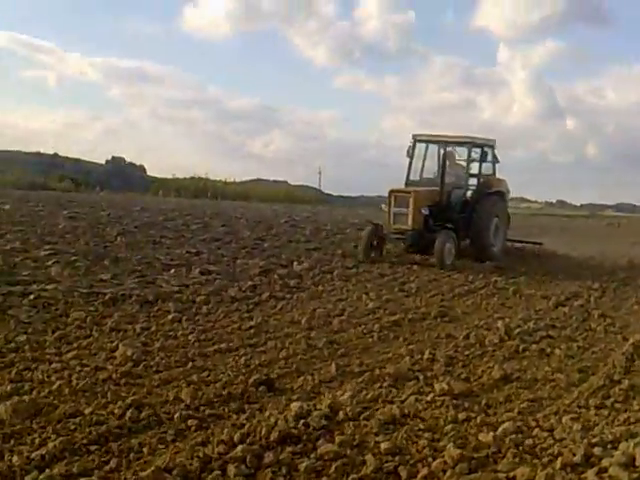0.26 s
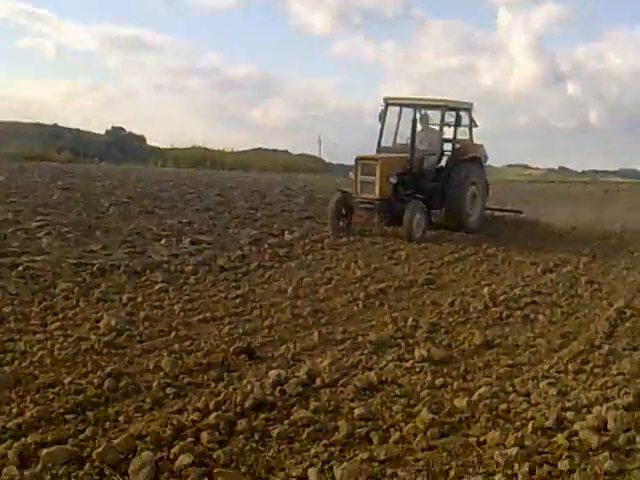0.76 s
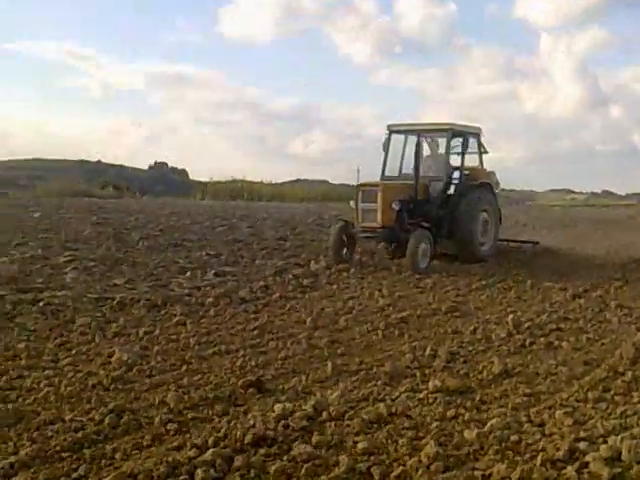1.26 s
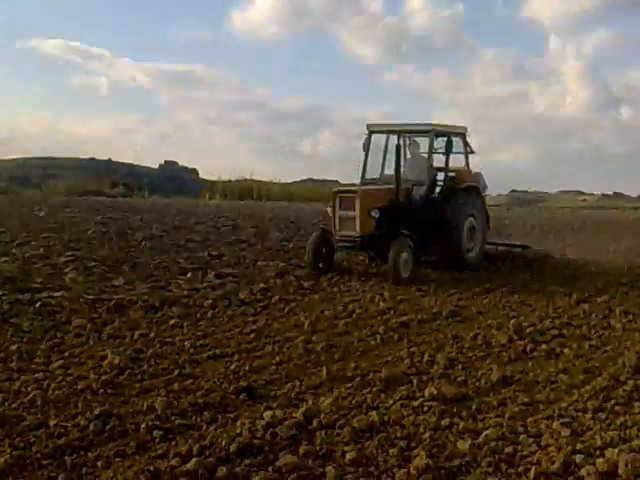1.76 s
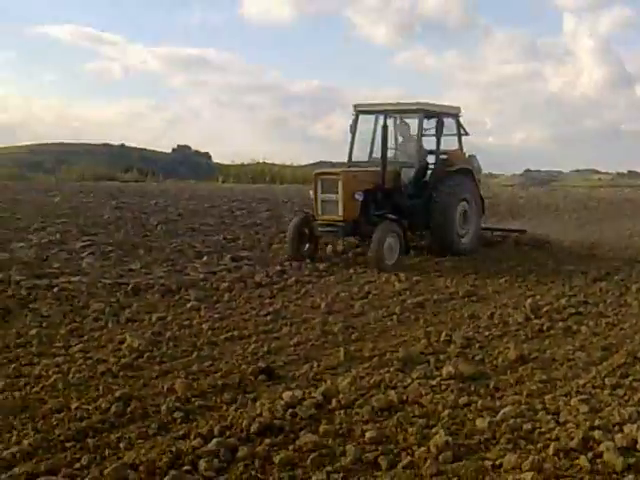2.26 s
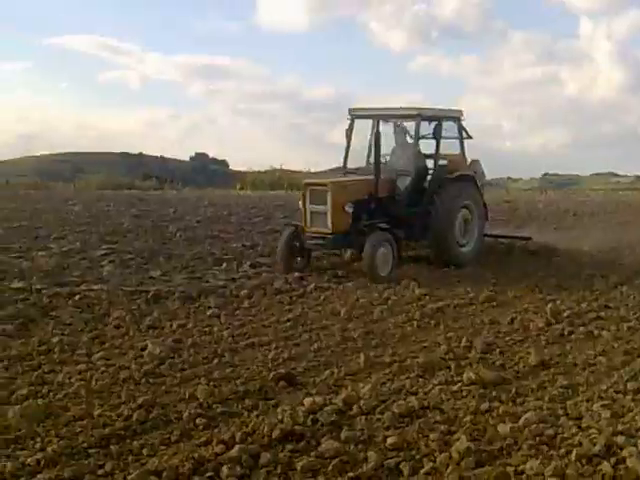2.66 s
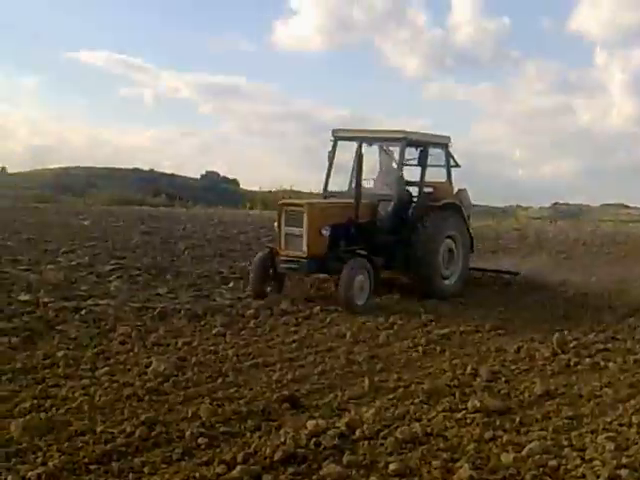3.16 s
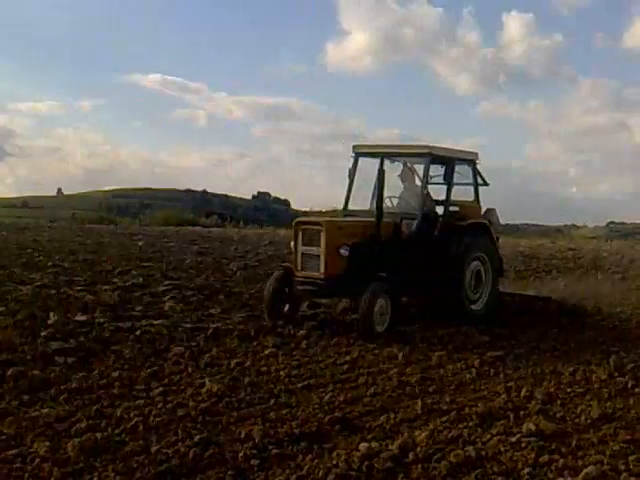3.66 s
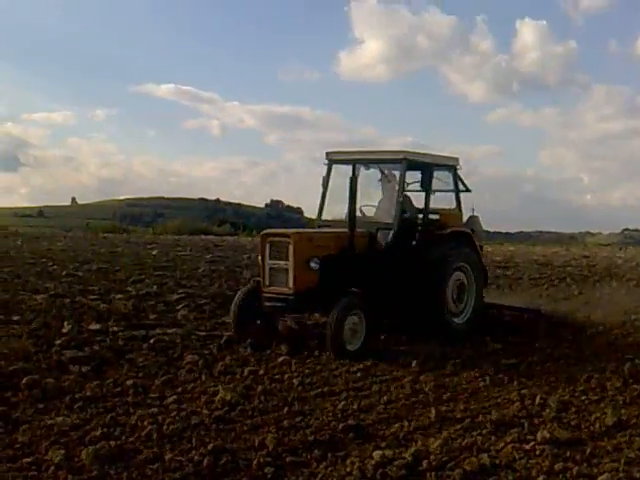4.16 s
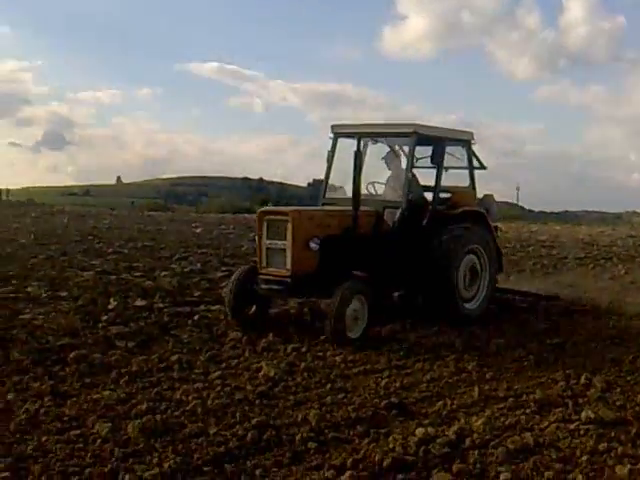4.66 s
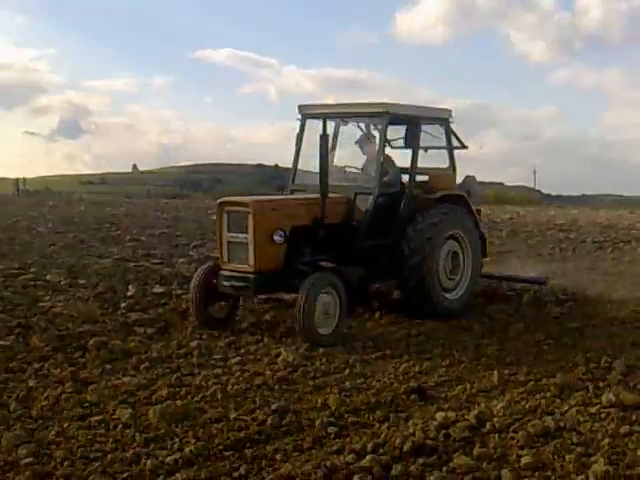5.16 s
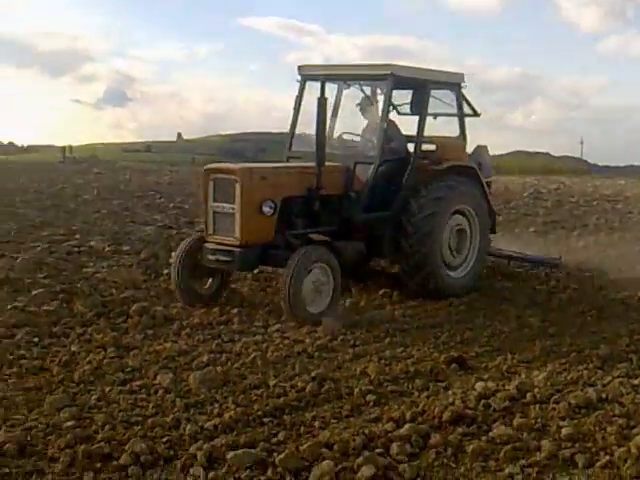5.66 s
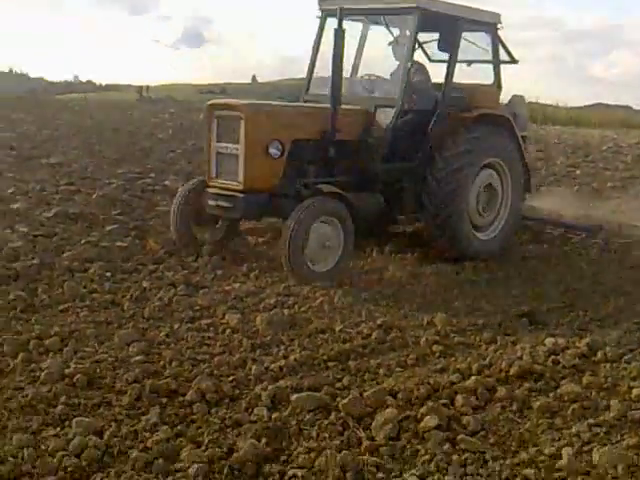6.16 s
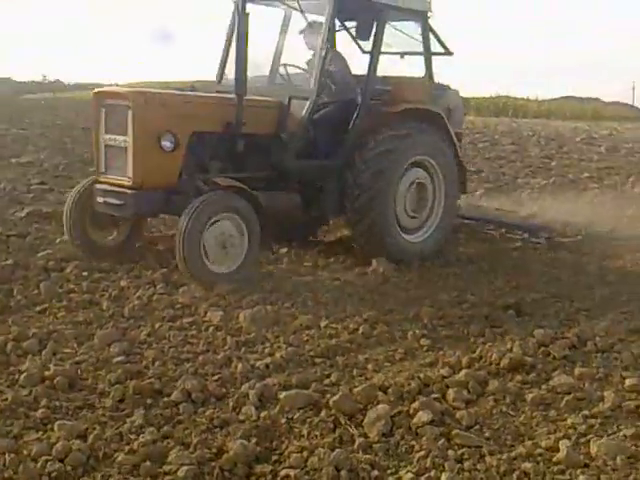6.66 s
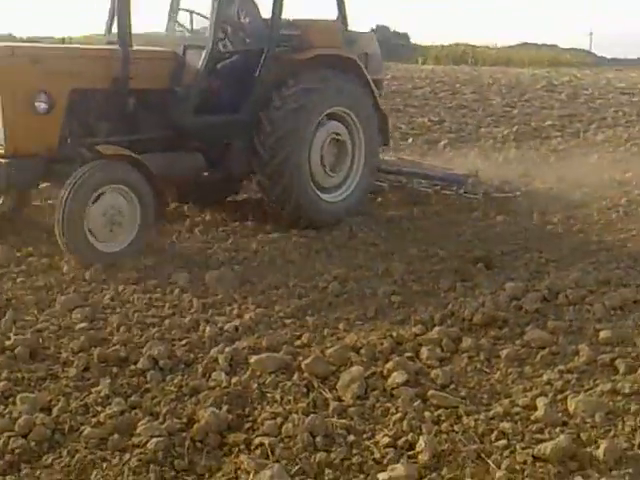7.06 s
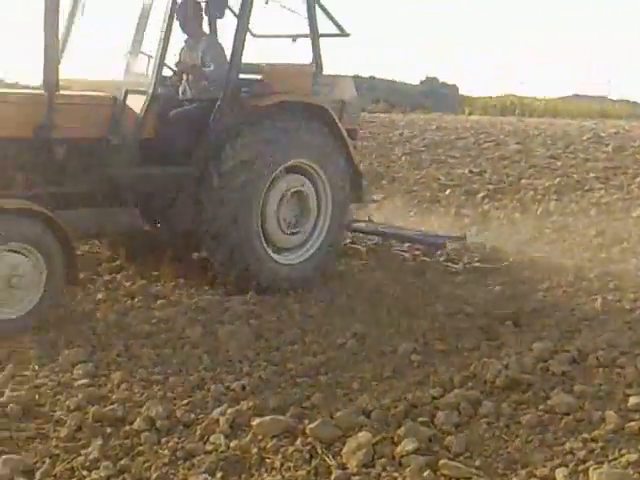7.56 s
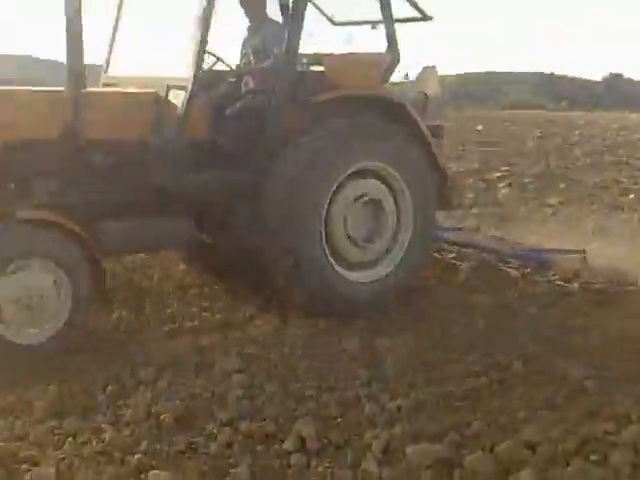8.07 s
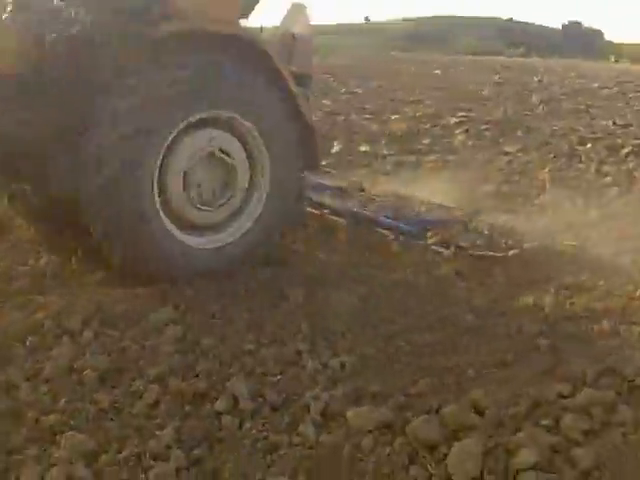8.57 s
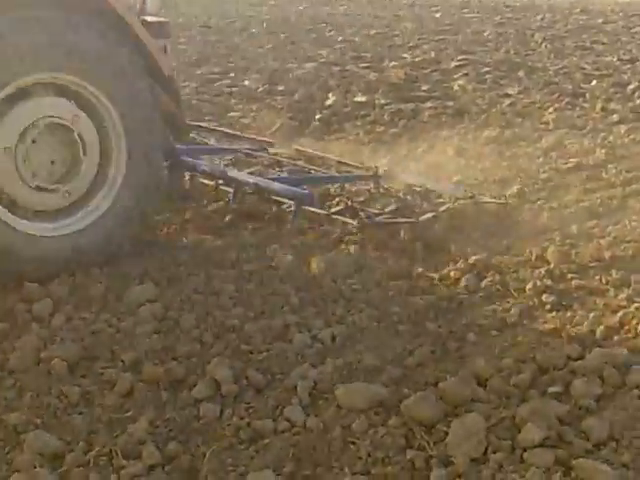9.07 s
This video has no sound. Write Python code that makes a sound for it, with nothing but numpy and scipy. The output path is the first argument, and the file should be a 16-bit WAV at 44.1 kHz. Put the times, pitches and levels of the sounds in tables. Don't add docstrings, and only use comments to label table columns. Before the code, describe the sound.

Low, rough four-cylinder diesel drone approaches across an open field with hard knocks, wind thumps, and clods rattling and hissing through a towed harrow.

```python
import sys
import numpy as np
from scipy import signal
from scipy.fft import rfft, irfft
from scipy.io import wavfile

SR = 44100
rng = np.random.default_rng(int(sys.argv[2]) if len(sys.argv) > 2 else 0)


def undo_db(level):
    steps = np.asarray(level, float) / 20
    return 10 ** steps


def unload_wav(signal):
    wavfile.write(
        sys.argv[1],
        SR,
        np.round(np.clip(np.atleast_2d(signal).T, -1, 1) * 32767).astype(np.int16),
    )


N = 410130

# time in seconds, firings per second.
FIRING_RATE = [(0.0, 50.06), (0.65, 49.95), (1.11, 50.1), (1.73, 49.4), (2.16, 50.27), (2.64, 49.82),
               (3.15, 46.97), (3.78, 49.25), (4.06, 48.76), (5.95, 49.29), (6.14, 49.56), (7.29, 47.29),
               (7.51, 47.81), (7.8, 49.28), (7.95, 48.98), (8.24, 46.11), (8.41, 45.3), (9.3, 44.56)]
# time in seconds, second order level in dB,
# first order level in dB relative to the second. (Order 1 = one wave per firing.)
EXHAUST_LEVELS = [(0, -34, 4), (.3, -26, -6), (1.7, -29, -17), (2.2, -26, 1), (2.7, -32.5, 6),
                  (3.15, -28, -6), (3.6, -26.5, -3), (4.1, -26, 1), (4.5, -23.5, -8), (5, -27, -3),
                  (6.3, -25, -10.5), (7.3, -26.5, -6), (7.75, -30.5, 7), (8.15, -31.5, 4.5),
                  (8.6, -22.5, -9), (9.3, -20, -5)]
# multiple of the firing rate, level in dB relative to the second order,
# dB gained when near.
UPPER_ORDERS = [(4, -15, 4), (5, -27, 21), (5.6, -44, 31), (6, -36, 22), (7, -27, 11), (8, -30, 15),
                (8.67, -34, 21), (10, -21, -12), (11, -22, -12), (15, -22, -2), (34.67, -23, -6)]
# time in seconds, nearness from 0 to 1, engine body level in dB.
APPROACH_PATH = [(0, 0, -32), (1.5, 0.02, -30.5), (3, 0.12, -31.5), (4.2, 0.16, -27.5), (6, 0.24, -27),
                 (7.2, 0.81, -24), (8.2, 0.88, -26), (8.8, 0.94, -21.5), (9.3, 0.93, -19)]
# frequency in Hz, level in dB per Hz.
FRONT_SPECTRUM = [(60, -3), (200, 6.5), (500, -1.5), (900, 0.5), (1300, 1), (1700, -4), (2400, -1.5),
                  (3100, -7.5), (3450, -16.5), (3900, -22.5), (4300, -32), (7000, -32), (11000, -40),
                  (15500, -45)]
# frequency in Hz, level in dB per Hz.
SIDE_SPECTRUM = [(60, -4), (220, -2.5), (480, -6.5), (660, 4), (900, -4), (1400, 2), (2000, 0),
                 (3100, -0.5), (3450, -9.5), (3900, -14), (4300, -28), (6500, -32), (10000, -35.5),
                 (15500, -45.5)]
# frequency in Hz, level in dB, 60 dB decay time in seconds.
BLOCK_MODES = [(583, 4.5, 0.05), (999, 2.5, 0.029), (1333, 3.5, 0.035), (1736, 0.5, 0.078),
               (2365, -1, 0.12), (2690, 2.5, 0.032)]
# start in seconds, lasting in seconds,
# peak level in dB, crack level in dB relative to the peak.
HARD_KNOCKS = [(2.6196, 0, -22, -30), (3.7169, 0, -14, -33), (4.9794, 0, -19, -33), (5.0266, .03, -15, -34),
               (5.6386, 0, -12, -38), (5.6775, 0, -4, -38), (5.697, 0, -15, -34), (6.737, 0, -3, -34),
               (6.7795, 0, -5, -36), (7.6572, .195, -7, -30), (8.903, 0, -11, -33), (8.9458, 0, -10, -33),
               (9.174, 0, -8, -26)]
# frequency in Hz, level in dB per Hz.
CRACK_SPECTRUM = [(2000, -16), (4500, 0), (9000, -2), (15500, -18)]
# frequency in Hz, level in dB per Hz.
TICK_SPECTRUM = [(3500, -20), (6300, -10), (7500, 2.5), (10000, 3.5), (11300, -5), (15500, -22)]
# frequency in Hz, level in dB, 60 dB decay time in seconds.
TINE_MODES = [(4400, -8, .004), (5100, -6, .004), (5700, -3, .006), (6300, 0, .012), (6600, -2, .01),
              (7400, -9, .004)]
# frequency in Hz, level in dB per Hz.
SOIL_SPECTRUM = [(2500, -20), (4300, 10), (6500, -5), (8000, -18), (12000, -21), (15500, -16)]
# frequency in Hz, level in dB per Hz.
WIND_SPECTRUM = [(15, -38), (30, 2), (45, 2), (80, 3), (150, -2), (300, -14), (600, -19.5), (1500, -52),
                 (8000, -110)]
# middle in seconds, level in dB, length in seconds.
WIND_GUSTS = [(0.058, -21, .08), (0.29, -26, 0.036), (0.456, -27, 0.11), (0.91, -28.5, 0.14),
              (1.24, -29, 0.13), (1.355, -23, 0.032), (1.443, -29, 0.055), (1.647, -26, 0.12),
              (1.893, -20, 0.047), (2.113, -23, 0.038), (2.26, -20, 0.12), (2.666, -25.5, 0.094),
              (2.77, -24, 0.079), (3.12, -28, 0.035), (3.504, -32, 0.021), (4.008, -24, 0.054),
              (4.148, -24.5, 0.064), (4.442, -27, 0.055), (4.692, -27, 0.042), (4.854, -28, 0.14),
              (5.464, -31, 0.044), (5.757, -30, 0.13), (6.163, -24.5, 0.029), (6.37, -33, 0.13),
              (6.78, -22.5, 0.11), (7.065, -25, 0.042), (7.42, -33, 0.049), (7.974, -24, 0.029),
              (8.177, -25.5, 0.073), (8.956, -29, 0.13)]
# middle in seconds, peak level in dB, swing frequency in Hz.
WIND_SLAMS = [
    (2.1265, -9.5, 64.7),
    (2.655, -22, 58),
    (2.72, -15, 60.5),
    (2.83, -14.5, 52),
    (3.109, -13.5, 90),
]
# middle in seconds, gain in dB, half width in seconds.
GAIN_SWELLS = [(0, 5, .12), (.8, 3, 0.26), (1.41, 4, 0.075), (1.72, 3.5, .12), (1.92, 4.5, 0.059),
               (2.16, 4.5, 0.17), (2.64, 5, 0.093), (3.44, 4, 0.13), (3.7, 4, 0.23), (4.2, 1, 0.059),
               (4.85, 2, 0.27), (5.04, 3, 0.071), (5.65, 5, 0.11), (6, 2.5, 0.081), (6.6, 1, 0.1),
               (6.93, -1, .08), (6.769, 3.5, 0.13), (7.37, 4.5, 0.11), (7.75, 9, 0.15), (8.67, 3.5, 0.12),
               (9.16, 1.5, 0.16)]


def rms_one(x):
    return x / np.sqrt(np.mean(x ** 2) + 1e-20)


def seconds():
    return np.arange(N) / SR


def in_time(rows):
    s, *columns = np.transpose(rows)
    return [np.interp(seconds(), s, column) for column in columns]


def slowly(shape):
    step = np.arange(0, N + 32, 32)
    return np.interp(np.arange(N), step, shape(step / SR))


def drift(rate):
    r = np.exp(-80 * np.pi * rate / SR)
    noise = rng.standard_normal(N // 40 + 2002)
    slow = signal.lfilter([1], [1, -2 * r, r * r], noise)[2000:]
    return np.interp(np.arange(N) / 40, np.arange(len(slow)), rms_one(slow))


def colour(x, spectrum):
    size = 16384
    hz, db = np.transpose(spectrum)
    grid = np.log(np.fft.rfftfreq(size, 1 / SR) + 1)
    cepstrum = irfft(np.log(undo_db(np.interp(grid, np.log(hz), db))))
    cepstrum[1:size // 2] *= 2
    cepstrum[size // 2 + 1:] = 0
    response = irfft(np.exp(rfft(cepstrum)))
    return rms_one(signal.fftconvolve(x, response)[:N])


def ring(clicks, hz, t60):
    r, w = undo_db(-60 / (t60 * SR)), 2 * np.pi * hz / SR
    return signal.lfilter([0, np.sin(w)], [1, -2 * r * np.cos(w), r * r], clicks + 1e-18)


def burst(clicks, decay_s):
    return signal.lfilter([1], [1, -np.exp(-1 / (decay_s * SR))], clicks + 1e-18)


def firings(turns, spread_db):
    at = np.flatnonzero(np.diff(np.floor(turns))) + 1
    clicks = np.zeros(N)
    clicks[at] = undo_db(spread_db * rng.standard_normal(600)[:len(at)])
    return clicks


def exhaust(turns, nearness, passed):
    second_db, first_db = in_time(EXHAUST_LEVELS)
    pipe_lag = 1.1
    tuned = np.exp(-((3 * in_time(FIRING_RATE)[0] - 146.3) / 3.7) ** 2)
    third_db = second_db - 11 + 8.5 * tuned + 5.5 * passed + 1.04 * drift(1.1)
    third_db += 0.16 * gain_db()
    first_db = second_db + first_db + 1.5 * drift(3)
    phase = 2 * np.pi * turns
    out = undo_db(second_db) * np.cos(2 * phase - pipe_lag)
    out += undo_db(third_db) * np.cos(3 * phase - pipe_lag)
    out -= undo_db(first_db) * np.cos(phase - 1.4 * pipe_lag)
    for order, db, near_db in UPPER_ORDERS:
        order_db = second_db + db + near_db * nearness - 4.5 * passed + 2.5 * drift(2.5)
        out += undo_db(order_db) * np.cos(order * phase + 0.5 * drift(2.5))
    return np.sqrt(2) * out


def body(turns, nearness):
    swell = 1 + 0.75 * burst(firings(turns - 0.03, spread_db=-3.5), decay_s=0.0025)
    roar = rng.standard_normal(N) * swell * undo_db(0.98 * drift(16.4))
    near = np.clip(nearness, 0, 1)
    roar = (1 - near) * colour(roar, FRONT_SPECTRUM) + near * colour(roar, SIDE_SPECTRUM)
    knock = np.zeros(N)
    for hz, db, t60 in BLOCK_MODES:
        knock += undo_db(db) * ring(firings(turns, spread_db=4.5), hz, t60)
    soft = signal.butter(6, 3400, fs=SR, output="sos")
    return roar + undo_db(-10.5) * rms_one(signal.sosfilt(soft, knock))


def knocks():
    blows, cracks = np.zeros((2, N))
    rate = in_time(FIRING_RATE)[0]
    spread_db = 2.5 * rng.standard_normal((len(HARD_KNOCKS), 2, 20))
    for (s, lasting, db, crack_db), (uneven, brittle) in zip(HARD_KNOCKS, spread_db):
        period = 1 / rate[round((s + lasting / 2) * SR)]
        later = np.arange(1 + int(max(lasting, 0) / period))
        at = np.round((s + period * later) * SR).astype(int)
        blows[at] = undo_db(db - 40.5 + uneven[later] * (later > 0))
        cracks[at] = undo_db(db + crack_db - 29 + brittle[later] * (later > 0))
    blow = burst(burst(blows, decay_s=0.001), decay_s=0.004)
    crack = burst(burst(cracks, decay_s=0.0005), decay_s=0.0015)
    out = blow * colour(rng.standard_normal(N), SIDE_SPECTRUM)
    return out + crack * colour(rng.standard_normal(N), CRACK_SPECTRUM)


def ticks(turns):
    clicks = firings(turns + 0.08, spread_db=2.8)
    snap = burst(burst(clicks, decay_s=0.0009), decay_s=0.0015)
    return colour(snap * rng.standard_normal(N), TICK_SPECTRUM)


def tone(turns, wobble):
    return np.sqrt(2) * undo_db(2.8 * drift(6)) * np.cos(2 * np.pi * turns + wobble * drift(14))


def panel(hz, t60):
    once = ring(rng.standard_normal(N), hz, t60)
    return rms_one(ring(once, hz, t60))


def bonnet():
    return panel(2330, t60=0.018)


def side_panel():
    return undo_db(2 * drift(5.5)) * panel(2934, t60=0.036)


def grains(size_db, per_second):
    sizes = undo_db(size_db * np.minimum(rng.exponential(1, N), 4)) * rng.choice([-1, 1], N)
    return sizes * (rng.random(N) < per_second / SR)


def harrow():
    struck = grains(2.5, 4000 * undo_db(3 * drift(20)))
    dealt = rng.integers(0, len(TINE_MODES), N)
    rattle = np.zeros(N)
    for k, (hz, db, t60) in enumerate(TINE_MODES):
        rattle += undo_db(db) * ring(struck * (dealt == k), hz, t60)
    return rms_one(rattle)


def dirt():
    return colour(grains(3, 3000) * undo_db(2.5 * drift(12)), SOIL_SPECTRUM)


def wind():
    s, db, length = np.transpose(WIND_GUSTS)[:, :, None]

    def gust_level(t):
        width = length * np.where(t < s, 1, 0.89)
        return np.sum(undo_db(db) * np.exp(-((t - s) / width) ** 2), axis=0)

    level = undo_db(-28 - 0.16 * seconds()) + slowly(gust_level)
    turbulence = rng.standard_normal(N) * undo_db(1.4 * drift(5.9))
    return undo_db(-0.5) * level * colour(turbulence, WIND_SPECTRUM)


def buffets():
    s, db, hz = np.transpose(WIND_SLAMS)[:, :, None]

    def swing(t):
        fade = np.exp(-((t - s) * hz / 1.4) ** 2)
        return -np.sum(undo_db(db) * fade * np.cos(2 * np.pi * hz * (t - s)), axis=0)

    return slowly(swing)


def gain_db():
    s, db, width = np.transpose(GAIN_SWELLS)[:, :, None]
    squareness = 1.1 + 0.27 * np.abs(db)
    return slowly(lambda t: np.sum(db * np.exp(-np.abs((t - s) / width) ** squareness), axis=0))


def scene():
    nearness, body_db = in_time(APPROACH_PATH)
    t, rate = seconds(), in_time(FIRING_RATE)[0]
    pass_s = 8.3
    passed = 0.5 + 0.5 * np.tanh((t - pass_s) / 0.16)
    turns = 0.146 + np.cumsum(rate) / SR

    tick_db = -37 + np.minimum(gain_db(), 8) + 0.5 * passed
    tick_db -= 13 * 4 * passed * (1 - passed)
    harrow_db = -42 + 14.5 * (1 - np.exp(-t / 2.8)) - 11.5 * nearness + 6 * passed
    harrow_db += 3 * np.maximum(t - pass_s, 0)
    bonnet_db = -24.5 + 6 * (49.9 - rate) - 17.5 * nearness
    abeam = np.exp(-((t - 8) / 0.6) ** 2)
    gear_db = -11.5 - 8 * nearness + 8 * abeam - 12 * passed
    axle_abeam = np.exp(-((t - 8.45) / 0.22) ** 2)
    side_panel_db = -40.5 + 33 * nearness

    machine = undo_db(0.93) * body(turns, nearness)
    machine += undo_db(tick_db) * ticks(turns)
    machine += undo_db(-8 - 28 * passed) * tone(8 / 3 * turns, wobble=0.29)
    machine += undo_db(gear_db) * tone(26 * turns, wobble=0.6)
    machine += undo_db(-13) * axle_abeam * tone(34.67 * turns, wobble=0.6)
    machine += undo_db(bonnet_db) * bonnet()
    machine += (1 - passed) * undo_db(side_panel_db) * side_panel()
    machine += undo_db(harrow_db) * harrow()
    machine += passed * undo_db(harrow_db + 4.5) * dirt()
    mix = exhaust(turns, nearness, passed) + undo_db(body_db) * machine + knocks() + wind() + buffets()
    return mix[None]


def low_pass(x):
    return signal.sosfilt(signal.butter(12, 15720, fs=SR, output="sos"), x)


def record(dry):
    hiss = undo_db(-76) * rng.standard_normal(dry.shape)
    x = undo_db(gain_db()) * dry + hiss
    overload = 0.715
    mix = x / (1 + np.abs(x / overload) ** 10) ** (1 / 10)
    return low_pass(mix)


dry = scene()
out = record(dry)
unload_wav(out)
```